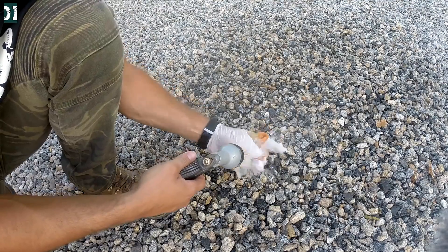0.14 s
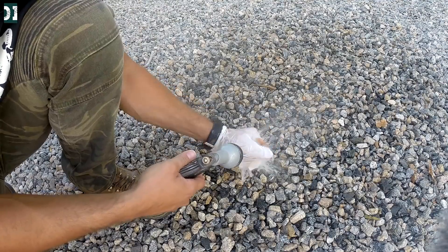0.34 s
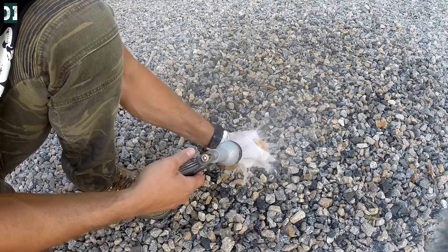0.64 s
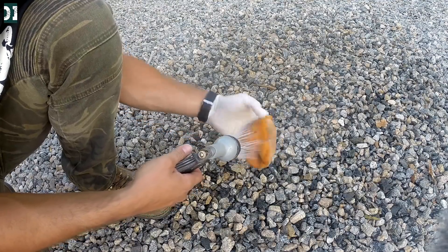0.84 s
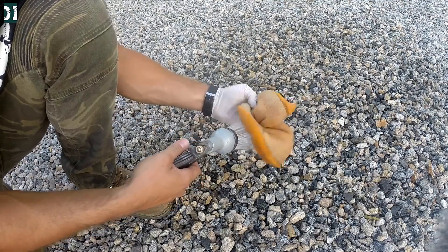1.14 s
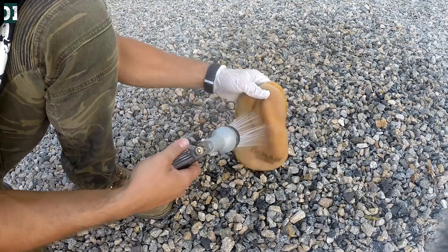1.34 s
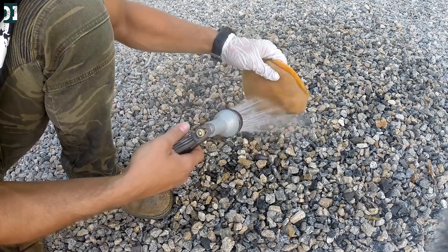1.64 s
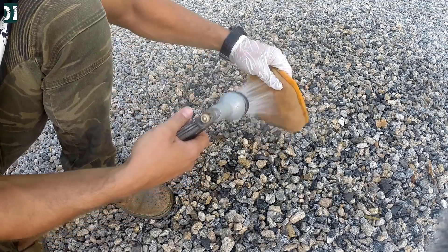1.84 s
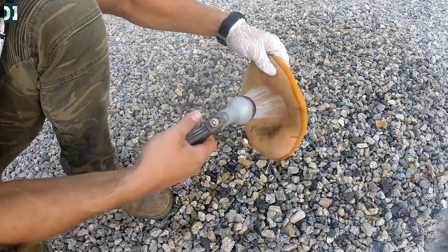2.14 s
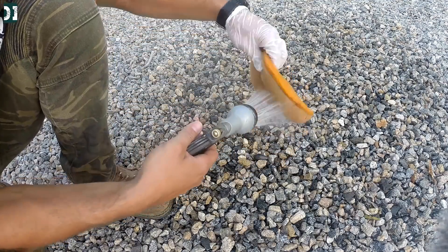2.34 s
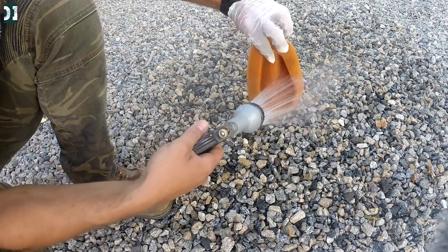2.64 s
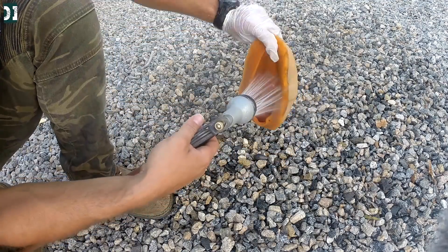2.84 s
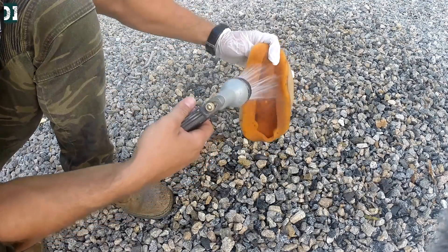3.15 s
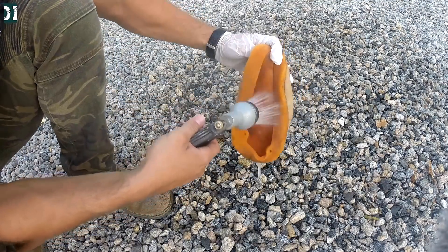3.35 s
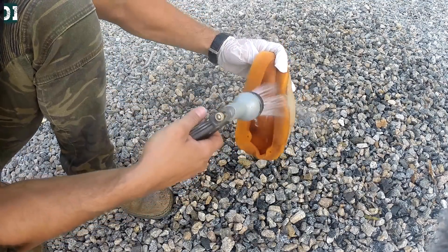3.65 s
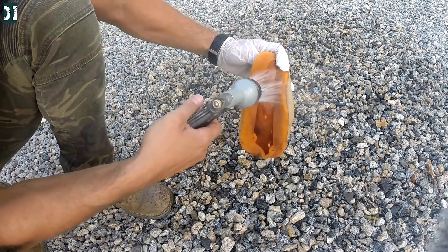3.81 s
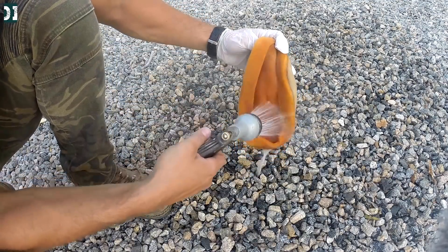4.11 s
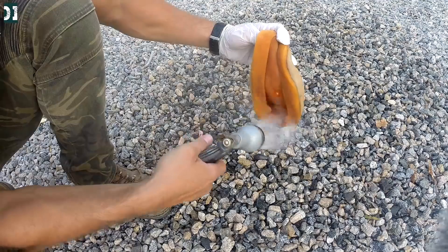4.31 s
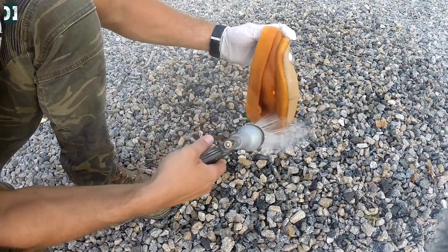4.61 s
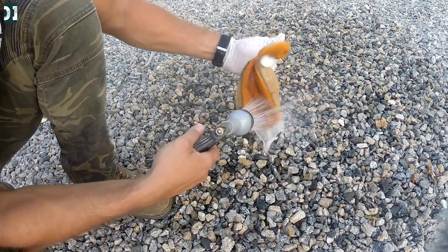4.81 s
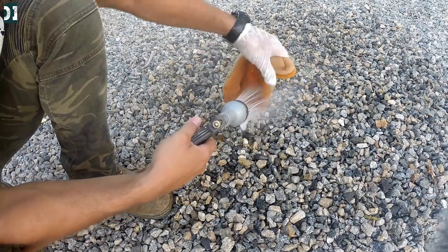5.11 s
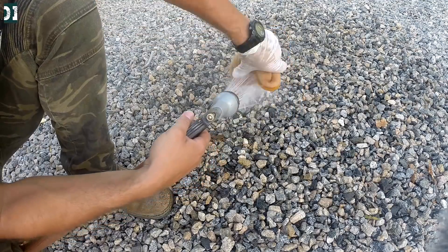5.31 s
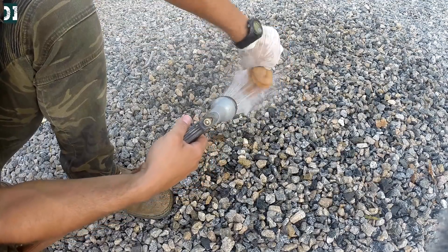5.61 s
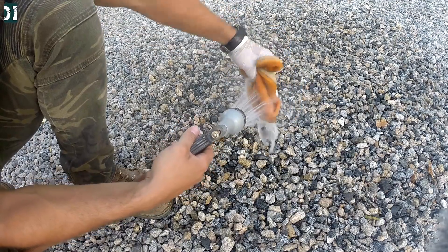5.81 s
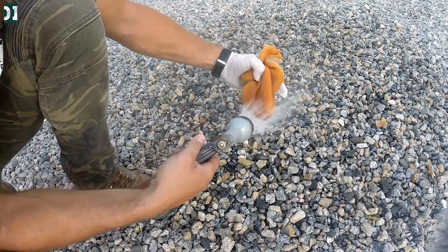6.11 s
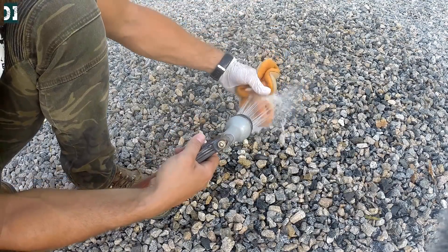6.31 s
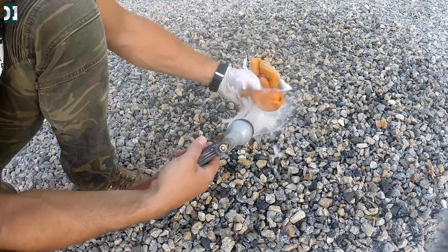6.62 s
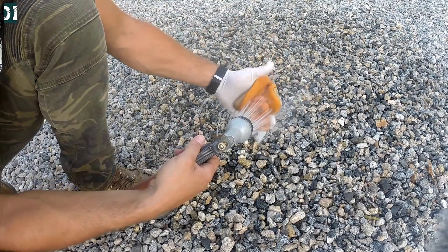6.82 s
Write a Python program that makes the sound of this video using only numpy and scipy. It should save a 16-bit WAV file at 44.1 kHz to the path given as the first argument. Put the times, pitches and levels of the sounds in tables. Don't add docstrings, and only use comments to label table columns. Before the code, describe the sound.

Outdoors, close to a small camera microphone, a hose nozzle sprays many fine jets against a foam sleeve over gravel. From 0 to 0.9 s the spray is full and bright, a dense patter with mist hiss and a few sharp drop clicks. Around 1 s it drops back, then flutters in pitch as the foam turns. At 2 to 2.4 s it surges loudly; from 2.6 to 2.85 s it thins while low breeze buffets the microphone. From 3.2 to 4.1 s jets blow into the open mouth, giving a fuller, deeper hollow drumming that stops quickly. Lighter spray follows, with gurgling hollow resonance near 5.2 s. A short bright burst comes at 5.3 to 5.5 s with a soft gust. After 5.9 s runoff murmurs more, and the squeezed foam drums unevenly, building towards the end near 7 s. A faint far hum stays underneath.

```python
import sys
import numpy as np
from scipy import signal
from scipy.fft import rfft, irfft, next_fast_len
from scipy.io import wavfile
from scipy.ndimage import uniform_filter1d, map_coordinates

SR = 44100
rng = np.random.default_rng(int(sys.argv[2]) if len(sys.argv) > 2 else 0)


def transcribe(u):
    v = np.clip(np.atleast_2d(u).T, -1, 1)
    q = np.round(v * 32767).astype(np.int16)
    wavfile.write(sys.argv[1], SR, q)


def elevation(decibels):
    levels = np.asarray(decibels, float)
    return 10 ** (levels / 20)


N = 306936

# (frequency [Hz], density [dB per Hz])
MURMUR_SPECTRUM = [(120, -11), (220, -4.5), (350, 0.5), (600, -0.5), (900, -9), (1300, -50)]


def unit(x):
    return x / np.sqrt(np.mean(x ** 2) + 1e-20)


def curves(rows):
    time_s, *columns = np.transpose(rows)
    return [np.interp(np.arange(N) / SR, time_s, column) for column in columns]


def wobble(knots_per_s):
    knots_per_s_max = 2000
    at = np.arange(0, N, 4)
    knots = rng.standard_normal(int(N * knots_per_s_max / SR) + 4)
    curve = map_coordinates(knots, [at * min(knots_per_s, knots_per_s_max) / SR])
    return unit(np.interp(np.arange(N), at, curve))


def bumps(time_s, height, length_s):
    t = np.arange(0, N, 32) / SR
    off = (t - time_s[:, None]) / np.reshape(length_s, (-1, 1))
    return np.interp(np.arange(N) / SR, t, height @ np.exp(-.5 * off ** 2))


def window(start_s, end_s, rise_s, fall_s):
    t = np.arange(N) / SR
    return (np.tanh((t - start_s) / rise_s) - np.tanh((t - end_s) / fall_s)) / 2


def coloured(x, spectrum):
    m = next_fast_len(N + 8192)
    hz, db = np.transpose(spectrum)
    log_hz = np.log(np.fft.rfftfreq(m, 1 / SR) + 1)
    gain = elevation(np.interp(log_hz, np.log(hz), db, left=-120, right=-120))
    return unit(irfft(rfft(x, m) * gain, m)[:N])


def patchy(patchy_db):
    z = signal.stft(rng.standard_normal(N), nperseg=512)[2]
    field = uniform_filter1d(rng.standard_normal(z.shape), 8, 0)
    field = uniform_filter1d(field, 12, 1)
    return signal.istft(z * elevation(patchy_db * unit(field)), nperseg=512)[1][:N]


def resonant(x, centre_hz, octaves_below, octaves_above):
    hz, t, z = signal.stft(x, SR, nperseg=512)
    frames = np.minimum((t * SR).astype(int), N - 1)
    off = np.log2((hz[:, None] + 1) / centre_hz[frames])
    below = np.broadcast_to(octaves_below, N)[frames]
    above = np.broadcast_to(octaves_above, N)[frames]
    gain = np.exp(-.5 * (off / np.where(off < 0, below, above)) ** 2)
    gain = gain / np.linalg.norm(gain, axis=0)
    return unit(signal.istft(z * gain, SR, nperseg=512)[1][:N])


def ringing(start, hz, size, cycles, length):
    k = np.arange(length)
    u = k * hz[:, None] / SR / cycles
    swell = size[:, None] * u * np.exp(1 - u)
    tones = swell * np.sin(2 * np.pi * cycles * u * (1 + 0.012 * u))
    return np.bincount((start[:, None] + k).ravel(), tones.ravel(), N + length)[:N]


def drops(centre_hz, spread, cycles, uneven_db, count, length):
    when, pitch, chance = rng.random((count, 3)).T
    start = (when * N).astype(int)
    hz = centre_hz[start] * 2 ** (spread * np.log(pitch / (1 - pitch)) / 2)
    hz = np.clip(hz, 400, 14000)
    size_db = np.minimum(-uneven_db * np.log(chance), 14)
    size = elevation(size_db) * np.sqrt(hz) / centre_hz[start]
    return unit(ringing(start, hz, size, cycles, length))


def outdoors():
    # (frequency [Hz], density [dB per Hz])
    hum_spectrum = [(15, -39), (25, -6.5), (90, -5), (160, -9), (250, -14), (400, -22.5), (700, -14.5),
                    (1100, -6.5), (2000, -60)]
    # (frequency [Hz], density [dB per Hz])
    buffet_spectrum = [(15, 10), (30, 4), (60, -6.5), (120, -16), (300, -32)]
    # (time [s], level [dB])
    runoff = [(0.0, -58), (0.45, -59), (1.9, -61), (3.1, -61.5), (5.5, -59), (5.97, -53.5), (6.1, -55.5),
              (6.62, -52), (6.74, -56), (6.96, -56)]
    # (time [s], peak [dB], length [s])
    gusts = [(2.54, -46, 0.044), (2.653, -41, 0.066), (2.875, -56, 0.086), (3.016, -60, 0.024),
             (3.205, -52, 0.068), (3.436, -54, 0.074), (3.742, -51, 0.036), (3.977, -47.5, 0.069),
             (4.386, -53, .04), (4.8, -61.5, .3), (5.184, -53, .05), (5.34, -49, 0.046),
             (5.5, -42.5, 0.053), (5.666, -44, 0.088), (5.8, -56, 0.044), (5.9, -59, .05),
             (6.12, -52.5, 0.16), (6.85, -55.5, 0.2)]
    hum_db, calm_db = -54, -64
    hum = elevation(hum_db - 1.5) * coloured(rng.standard_normal(N), hum_spectrum)
    murmur = elevation(curves(runoff)[0] - 3.5) * coloured(patchy(patchy_db=2.0), MURMUR_SPECTRUM)
    buffet = unit(elevation(1.1 * wobble(24)) * coloured(rng.standard_normal(N), buffet_spectrum))
    time_s, peak_db, length_s = np.transpose(gusts)
    breeze = (elevation(calm_db) + bumps(time_s, elevation(peak_db), length_s)) * buffet
    return hum + murmur + breeze


def ticks():
    # (time [s], peak [dB], pitch [Hz])
    big_drops = [(0.1367, -12, 2740), (0.5301, -9, 3270), (0.689, -9, 3100), (0.8989, -30, 7560),
                 (1, -19, 8400), (1.3374, -20, 3220), (1.819, -31, 3150), (2.02, -11, 3650),
                 (2.889, -17, 2680), (4.381, -18, 3130), (4.458, -40, 3190), (4.52, -27, 3060),
                 (5.006, -13, 3420), (5.0459, -15, 8160), (6.4584, -24, 2830), (6.799, -29, 8000)]
    time_s, peak_db, hz = np.transpose(big_drops)
    return ringing((time_s * SR).astype(int), hz, elevation(peak_db - 8), cycles=0.66, length=200)


def splashes():
    # (time [s], level [dB], length [s])
    glances = [
        (1.0, -41, .03),
        (2, -37, 0.028),
        (3.64, -38, 0.028),
        (4.38, -44, .015),
        (5.357, -37, 0.027),
        (6.59, -42, 0.019),
        (6.65, -39, 0.011),
    ]
    centre_hz, octaves_below, octaves_above = 4000, 0.34, 0.41
    time_s, db, length_s = np.transpose(glances)
    burst = resonant(rng.standard_normal(N), np.full(N, centre_hz), octaves_below, octaves_above)
    return bumps(time_s, elevation(db), length_s) * burst


def cups():
    # (time [s], level [dB], pitch [Hz], length [s])
    catches = [(0.167, -38, 2780, .025), (.29, -36, 2400, 0.023), (0.454, -32.5, 3100, 0.032),
               (.75, -33.5, 3600, .03), (1.068, -39.5, 3130, 0.029), (1.213, -42, 3220, .03),
               (1.827, -41.5, 3300, 0.015), (2.03, -34.5, 3670, 0.021), (2.065, -45, 2800, .02),
               (2.895, -38.5, 2620, 0.025), (3.098, -37.5, 2700, 0.013), (3.36, -43, 2860, 0.035),
               (3.63, -36, 2950, 0.018), (3.87, -36.5, 3160, .03), (4.17, -44, 2130, 0.023),
               (4.256, -41, 2170, 0.016), (4.384, -42, 3260, 0.015), (5.447, -35.5, 3120, 0.014),
               (5.65, -38.5, 2780, 0.0089), (6.582, -37, 3430, 0.013), (6.622, -34, 2730, .015)]
    time_s, db, hz, length_s = np.transpose(catches)
    centre_hz = np.interp(np.arange(N) / SR, time_s, hz)
    return bumps(time_s, elevation(db), length_s) * resonant(rng.standard_normal(N), centre_hz, 0.096, 0.087)


def mist(caught_db, folds_hz, flicker_db):
    # (frequency [Hz], density [dB per Hz])
    hiss_spectrum = [(3000, -46), (5500, -15.5), (6600, -6), (7600, -1.5), (8500, -1), (9400, -8.5),
                     (10300, -12), (12500, -23)]
    # (frequency [Hz], density [dB per Hz])
    spatter_spectrum = [(1500, -29), (3500, -9), (4500, -3.5), (6000, -5.5), (6800, -21), (9000, -37)]
    # (frequency [Hz], density [dB per Hz])
    air_spectrum = [(8500, -7), (10300, -9.5), (11800, -4), (13300, -2), (14400, -3.5), (16000, -5.5)]
    usual_db, usual_hz = -38, 2700
    mist_db, mist_follows, air_follows = -40, 0.98, -.25
    spatter_db, spatter_db_per_octave = -5, 3.5

    swell_db = caught_db - usual_db
    hiss_db = mist_db + mist_follows * swell_db + 0.13 * wobble(14)
    tightness_octaves = np.log2(folds_hz / usual_hz)
    spatter_db = spatter_db + spatter_db_per_octave * tightness_octaves + 0.38 * wobble(8)
    air_db = -.6 + air_follows * swell_db + 0.6 * wobble(10)

    impacts = elevation(1.75 * wobble(1900))
    hiss = coloured(impacts * patchy(patchy_db=1.0), hiss_spectrum)
    spatter = coloured(impacts * patchy(patchy_db=3.0), spatter_spectrum)
    air = coloured(impacts * elevation(0.33 * wobble(760)) * patchy(patchy_db=1.0), air_spectrum)
    return elevation(hiss_db + 0.25 * flicker_db) * (hiss + elevation(spatter_db) * spatter + elevation(air_db + 0.85) * air)


def hand():
    # (time [s], jets caught [dB], cupping toward the jets [dB], pitch of the wet folds [Hz],
    # mist thrown back [dB])
    sleeve = [(0.0, -35, -6.5, 3030, -1.5), (0.3, -32.5, -7.5, 2670, 1.5), (0.75, -32.5, -11, 3220, -5),
              (0.95, -41.0, -8, 2980, 2.0), (1.4, -38.5, -8.5, 2900, -2), (1.95, -44.5, -3, 3260, 0.5),
              (2.13, -47.5, -4.5, 2600, -1.5), (2.5, -41, -9, 2620, 1), (2.9, -39.5, -6, 2660, -3.5),
              (3.4, -38, -5.5, 2450, -0.5), (4.05, -35, -4.0, 2410, 0.5), (4.45, -41.5, -4, 2150, -2.0),
              (5.15, -42.5, 5.5, 2100, 2.5), (5.4, -47.5, -13, 3070, -0.5), (5.7, -44, -7.5, 2560, 0.5),
              (6.2, -42.5, 2.5, 2470, 3.0), (6.6, -39, 0.5, 2700, 2), (6.96, -36, -6.5, 2650, -1.5)]
    # (time [s], change [dB], length [s])
    swings = [(0.157, 1.5, 0.03), (0.359, -3.0, 0.015), (0.774, 3.0, 0.03), (1.07, 2.5, 0.012),
              (1.492, -3.5, 0.019), (1.658, 4.0, 0.03), (1.92, -1, 0.013), (2.277, -4.5, 0.026),
              (2.415, -5, 0.061), (2.749, -6, 0.019), (3.058, -2.5, 0.017), (3.168, -4.0, 0.032),
              (3.365, 3.5, 0.065), (3.65, 6, 0.017), (4.302, -2.5, 0.015), (4.545, 4.5, 0.027),
              (4.77, 1, 0.051), (4.974, -1.5, 0.02), (5.055, -3.5, 0.048), (5.289, 6.5, 0.02),
              (5.612, 7.5, 0.044), (5.864, 4, 0.06), (6.02, 1, 0.068), (6.46, 5, 0.012),
              (6.593, 4.5, 0.028), (6.725, -3.0, 0.019)]
    # (time [s], change [dB])
    flicks = [(.99, 4), (1.555, 2.5), (1.6, -3.5), (2.565, 2), (3.1, 0), (3.53, -4), (4.43, 4.5),
              (4.455, 2.5), (4.485, -5), (4.6, 0), (4.64, 0), (4.69, 3), (5.0, 3.5), (5.7, -2), (6.8, -2.5),
              (6.89, 1.5)]
    # (start [s], end [s], change [dB])
    passes = [
        (1.978, 2.407, 13.5),
        (2.607, 2.845, -8),
        (5.328, 5.467, 16),
    ]
    # (time [s], pitch change [octaves], length [s])
    twists = [(0.538, 0.17, 0.041), (.87, -0.32, .04), (1.023, 0.23, 0.059), (1.673, -0.41, 0.044),
              (1.817, 0.11, .03), (2.0, 0.14, 0.023), (3.52, -0.19, 0.035), (3.623, 0.063, 0.02),
              (3.867, 0.07, 0.04), (4.315, -0.19, 0.026), (5.377, 0.32, 0.023), (5.445, -0.11, .03),
              (5.652, -0.28, 0.027), (6.24, -0.0078, 0.033), (6.448, -.12, 0.042), (6.623, -0.024, .04)]
    flick_s, edge_s, octaves_per_swing_db = 0.0049, 0.025, 0.011

    caught_db, cupping_db, folds_hz, rebound_db = curves(sleeve)
    swing_db = bumps(*np.transpose(swings)) + bumps(*np.transpose(flicks), flick_s)
    pass_db = sum(db * window(start_s, end_s, edge_s, edge_s) for start_s, end_s, db in passes)
    pitch_octaves = octaves_per_swing_db * swing_db + bumps(*np.transpose(twists))
    return caught_db + swing_db + pass_db, cupping_db, folds_hz * 2 ** pitch_octaves, rebound_db


def ring(level_db, centre_hz, below, above, spread, cycles, drop_share, count, length):
    noise = resonant(patchy(patchy_db=2.5), centre_hz, below, above)
    patter = drops(centre_hz, spread, cycles, uneven_db=2.5, count=count, length=length)
    return elevation(level_db + 0.11 * wobble(25)) * unit(noise + drop_share * patter)


def foam(caught_db, cupping_db, folds_hz, flicker_db):
    # (time [s], change [dB], length [s])
    hollow_swells = [(0.549, -2.5, 0.064), (0.778, -4, 0.014), (1.163, 5.5, 0.025), (1.242, 8.5, 0.024),
                     (1.335, -7, 0.025), (1.706, 4.5, 0.02), (2.037, -11, 0.054), (2.314, 8.5, 0.041),
                     (2.433, 11, 0.038), (2.489, 4.5, 0.021), (3.01, 5.5, 0.041), (3.14, 6, 0.02),
                     (3.652, -6.5, 0.021), (4.29, 6, 0.067), (4.428, 1, 0.0092), (4.569, 8.5, 0.0083),
                     (4.799, 5, 0.021), (5.22, 4.5, 0.018), (5.265, 5.5, 0.071), (5.32, 5, 0.015),
                     (5.792, 8, 0.025), (6.35, -7, 0.07), (6.622, -7, 0.015), (6.675, -7, 0.017)]
    # (time [s], pitch [Hz])
    hollow_pitch = [(0, 1430), (.5, 1590), (1.3, 1610), (2.12, 1540), (2.32, 1396), (2.95, 1260),
                    (3.3, 1490), (4.15, 1254), (4.45, 1480), (4.75, 1276), (5.2, 1390), (5.3, 1290),
                    (5.6, 1460), (5.82, 1350), (6.1, 1505), (6.96, 1450)]
    # (frequency [Hz], gain [dB])
    ground = [(20, 11), (900, 0.5), (1100, -1), (1550, -1.5), (1780, 0), (2050, 2.5), (16000, -9)]
    pocket_db, pocket_hz, pocket_follows = -13.5, 870, 0.78
    hollow_db, hollow_octaves, narrowing_per_db = 0.57, 0.31, 0.017
    folds_db, folds_octaves = 1.04, 0.4
    mouth_db = 12.5

    mouth = window(start_s=3.2, end_s=4.13, rise_s=0.18, fall_s=0.01)
    hollow_rise_db = cupping_db + bumps(*np.transpose(hollow_swells))

    pocket_level_db = caught_db + pocket_follows * hollow_rise_db + pocket_db + mouth_db * mouth
    pocket = ring(pocket_level_db, pocket_hz * 2 ** (0.034 * wobble(4)), 0.24, 0.65,
                  spread=0.14, cycles=4.1, drop_share=0.19, count=2500, length=360)

    hollow_hz = curves(hollow_pitch)[0] * 2 ** (0.07 * wobble(9))
    breadth = np.clip(hollow_octaves * (1 - narrowing_per_db * cupping_db), .1, .6)
    hollow = ring(caught_db + hollow_rise_db + hollow_db, hollow_hz, breadth, breadth,
                  spread=0.21, cycles=1.29, drop_share=0.59, count=5000, length=300)

    breadth = np.clip(folds_octaves * (1 - .015 * cupping_db) + 0.067 * wobble(10), .12, .9)
    folds = ring(caught_db + folds_db, folds_hz * 2 ** (0.055 * wobble(12)), breadth, 2.05 * breadth,
                 spread=0.301, cycles=1.23, drop_share=0.49, count=9000, length=140)

    body = elevation(-1.5 + 0.13 * flicker_db) * pocket
    body += elevation(0.46 + 0.52 * flicker_db) * hollow
    body += elevation(-1.27 + 0.88 * flicker_db) * folds
    return np.std(body) * coloured(body, ground)


def spray():
    # (time [s], change [dB], length [s])
    puffs = [(0.663, 2.0, 0.069), (1.19, 0, 0.012), (1.39, 2, 0.043), (1.726, 3.5, 0.019),
             (1.851, 0, 0.0097), (2.759, 6, 0.077), (2.928, -2.5, 0.029), (3.732, 3, 0.015),
             (3.831, -1.5, 0.025), (4.132, 4, 0.023), (4.487, 3.5, 0.023), (4.578, -2, 0.025),
             (4.825, -0.5, 0.034), (5.463, -4, 0.013), (5.604, -4, 0.042), (5.916, -1.5, 0.023),
             (6.022, 2, 0.033), (6.552, 0, 0.011)]
    flicker_db = 0.037 * wobble(6.9) + 0.83 * wobble(60) + 0.65 * wobble(400)
    caught_db, cupping_db, folds_hz, rebound_db = hand()
    rebound_db = rebound_db + bumps(*np.transpose(puffs))
    drumming = foam(caught_db, cupping_db, folds_hz, flicker_db)
    hissing = elevation(rebound_db) * mist(caught_db, folds_hz, flicker_db)
    return drumming + hissing + cups() + splashes()


def scene():
    # (frequency [Hz], density [dB per Hz])
    ports = [(20, -1), (100, -12), (250, -20), (400, -32), (600, -60)]
    jets = spray()
    loudness = np.sqrt(np.abs(uniform_filter1d(jets ** 2, size=4096))) / elevation(-32.5)
    steady, ducked = rng.standard_normal((2, N))
    side = elevation(-73.5) * coloured(steady, ports)
    side += elevation(-83) * coloured(ducked, MURMUR_SPECTRUM) / (1 + loudness ** 5)
    mid = jets + ticks() + outdoors()
    return np.array([mid + side, mid - side])


def band_limit(x):
    return signal.sosfilt(signal.butter(12, 16620, fs=SR, output="sos"), x)


def record(dry):
    top_hz = 15335
    m = next_fast_len(N + 8192)
    passed = np.fft.rfftfreq(m, 1 / SR) < top_hz
    limited = irfft(rfft(dry, m) * passed, m)[:, :N]
    return band_limit(limited)


dry = scene()
out = record(dry)
transcribe(out)
```